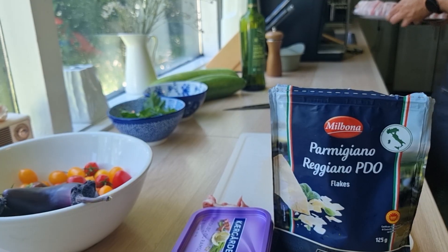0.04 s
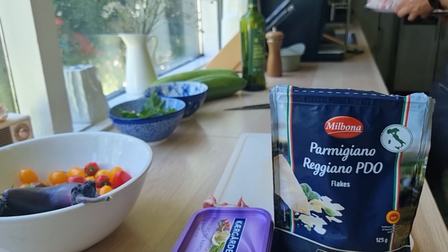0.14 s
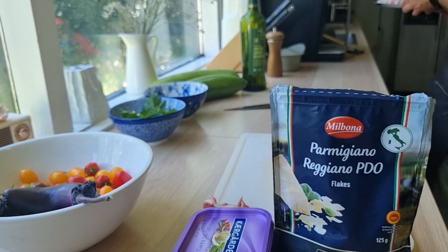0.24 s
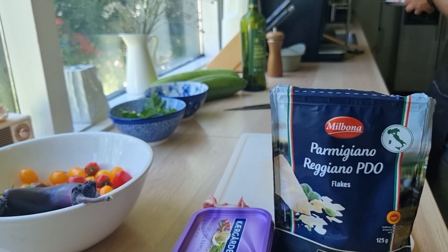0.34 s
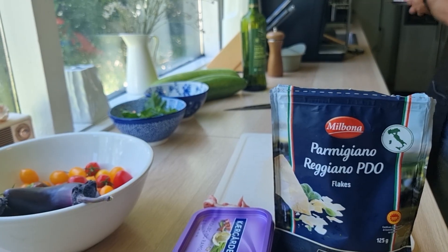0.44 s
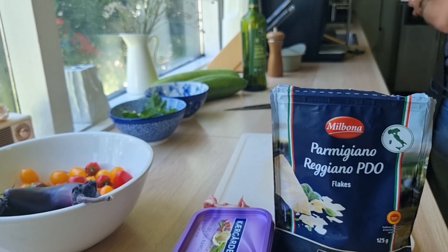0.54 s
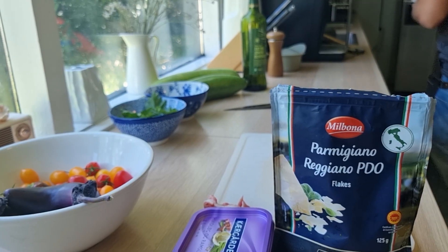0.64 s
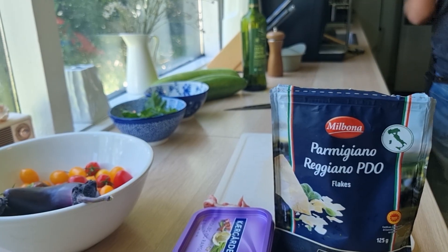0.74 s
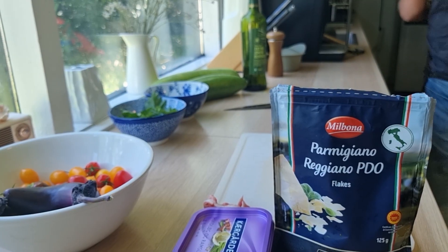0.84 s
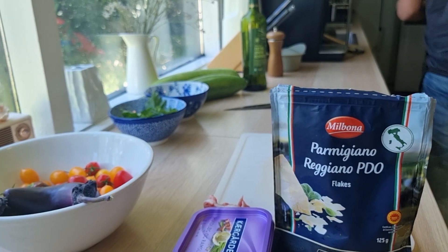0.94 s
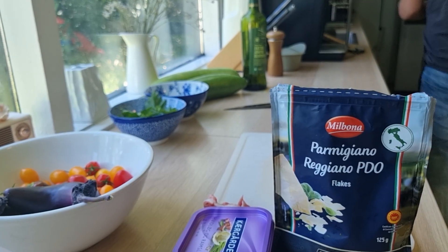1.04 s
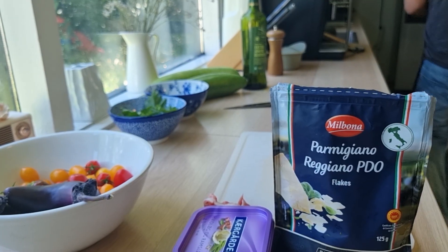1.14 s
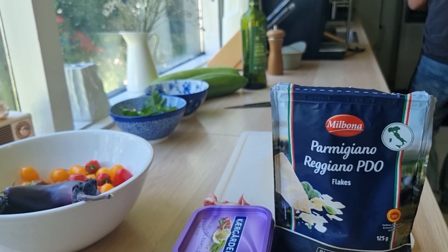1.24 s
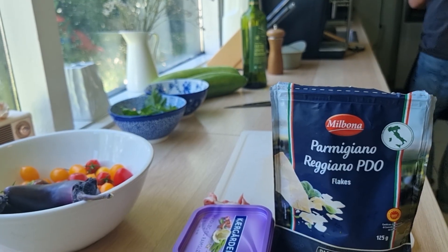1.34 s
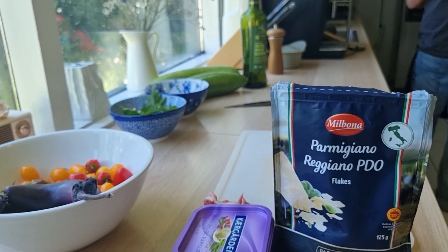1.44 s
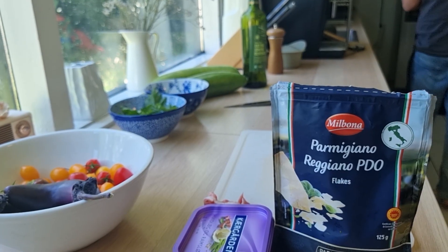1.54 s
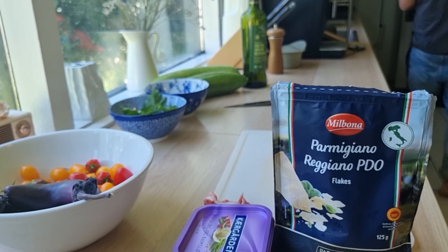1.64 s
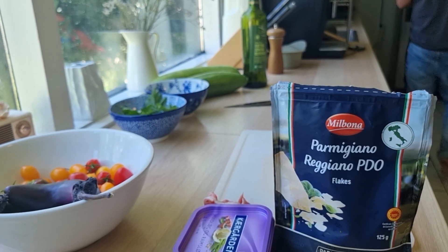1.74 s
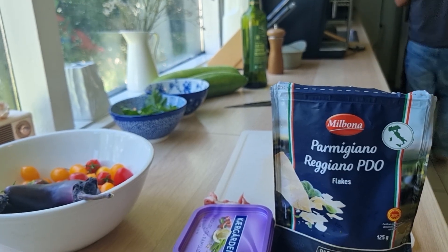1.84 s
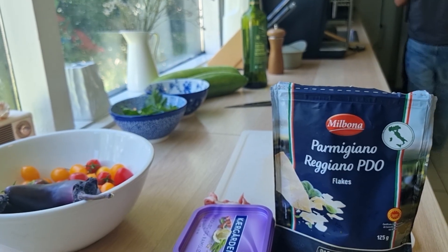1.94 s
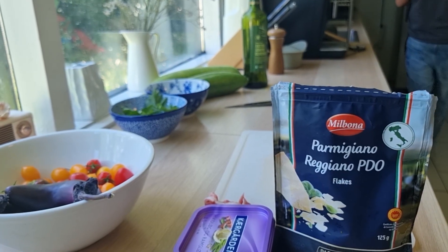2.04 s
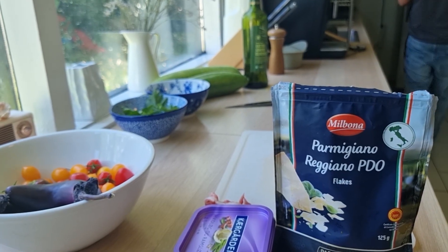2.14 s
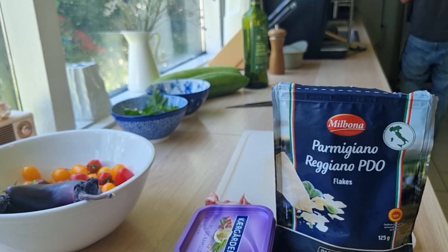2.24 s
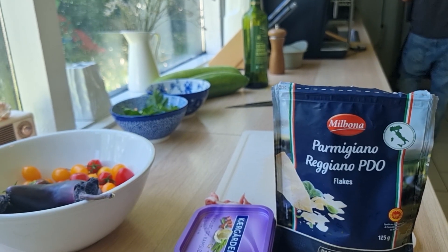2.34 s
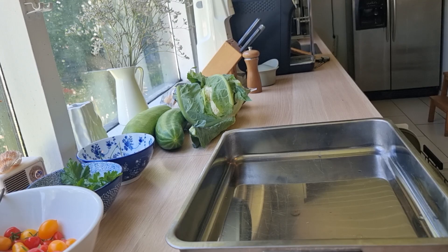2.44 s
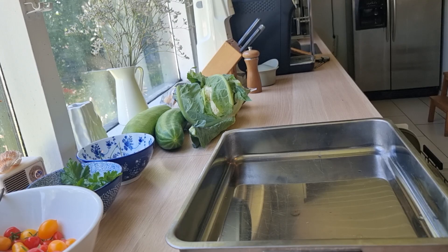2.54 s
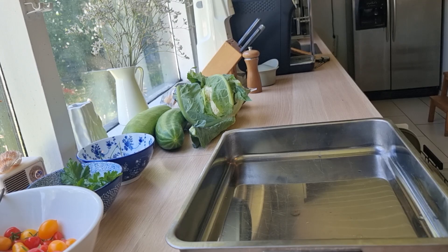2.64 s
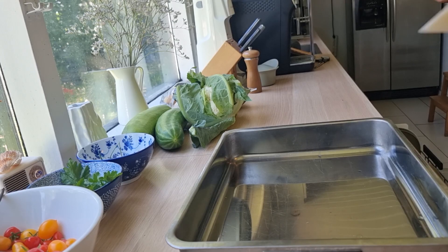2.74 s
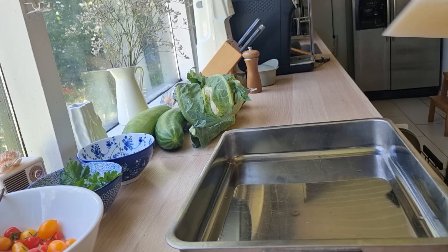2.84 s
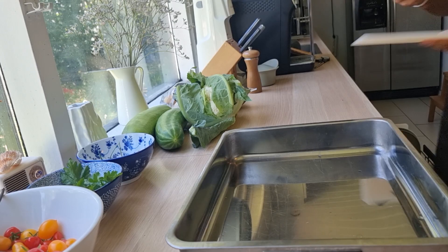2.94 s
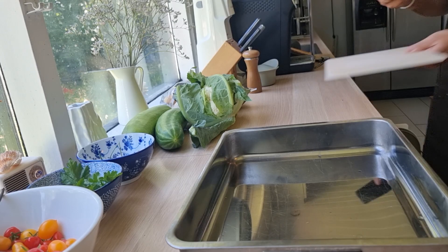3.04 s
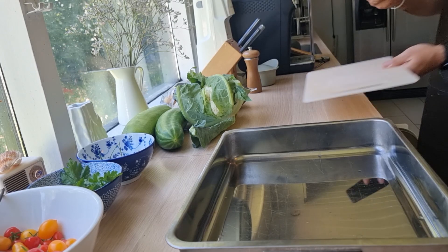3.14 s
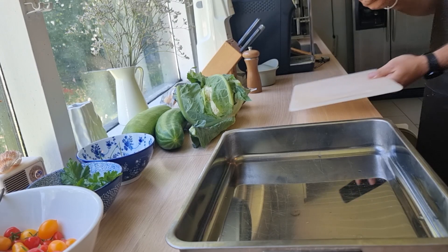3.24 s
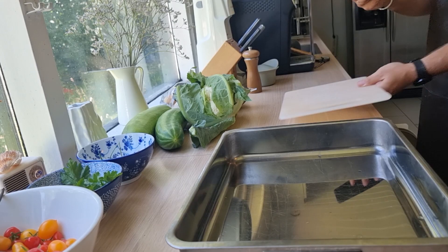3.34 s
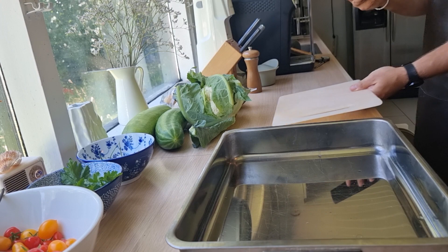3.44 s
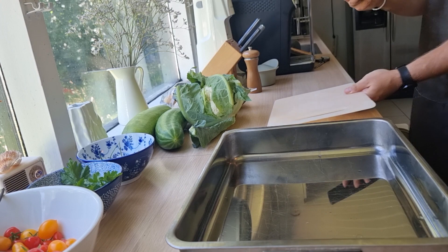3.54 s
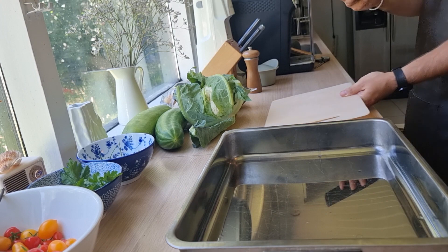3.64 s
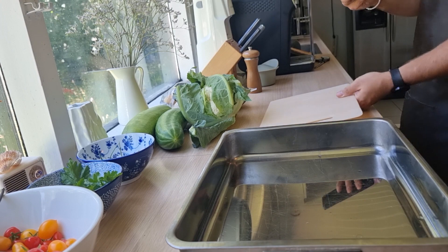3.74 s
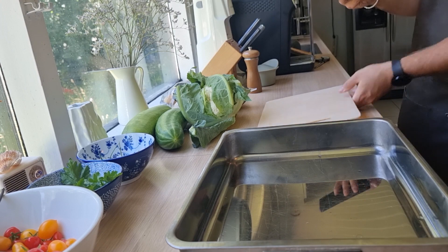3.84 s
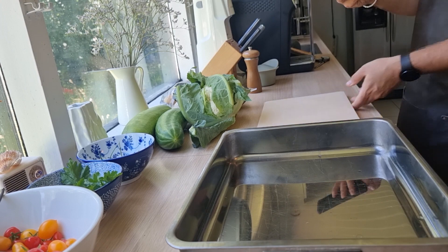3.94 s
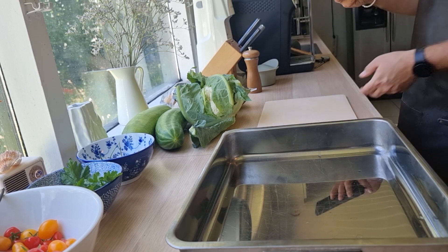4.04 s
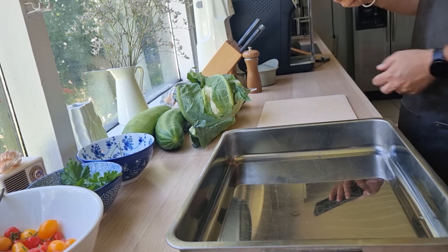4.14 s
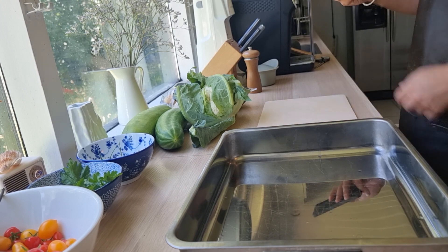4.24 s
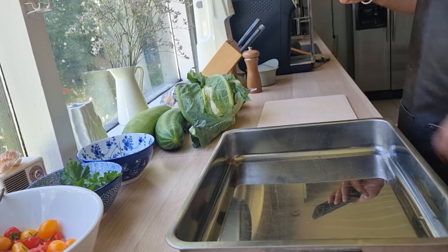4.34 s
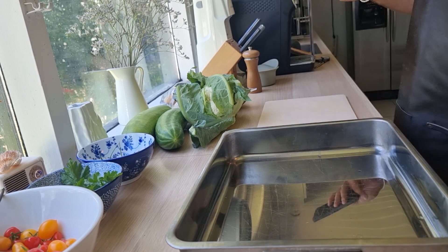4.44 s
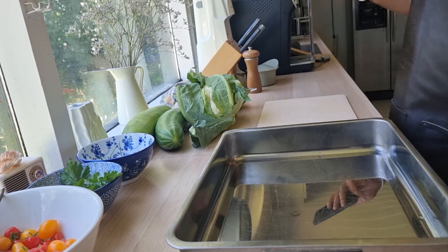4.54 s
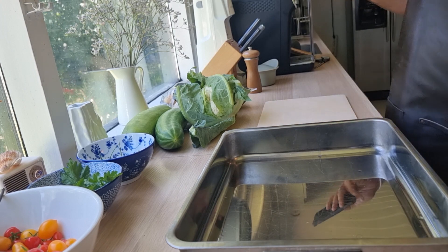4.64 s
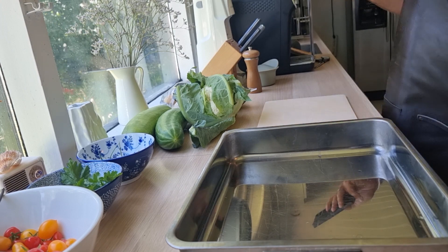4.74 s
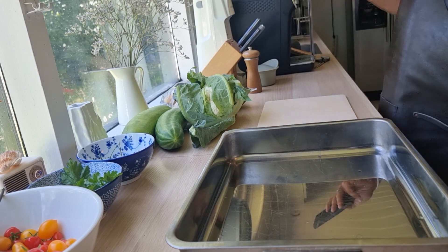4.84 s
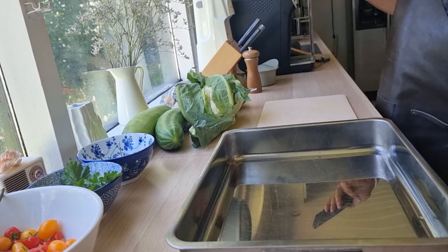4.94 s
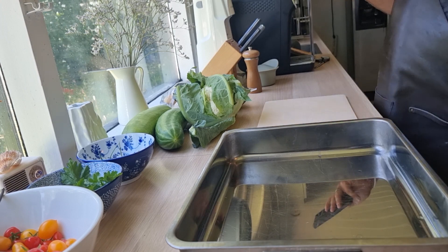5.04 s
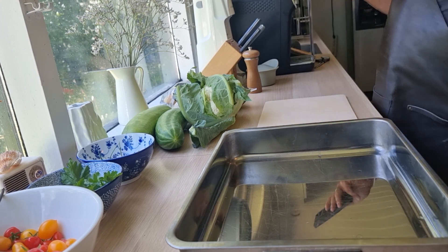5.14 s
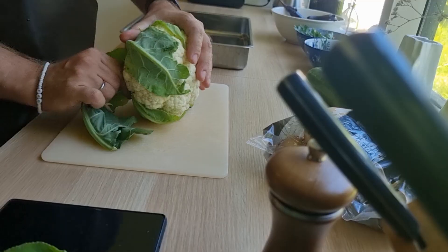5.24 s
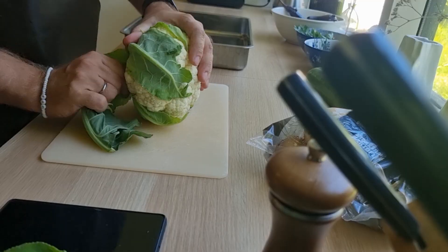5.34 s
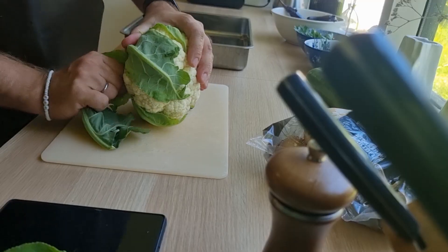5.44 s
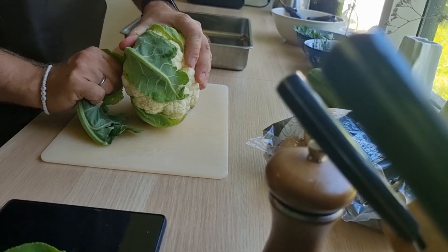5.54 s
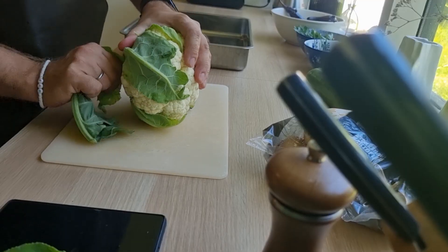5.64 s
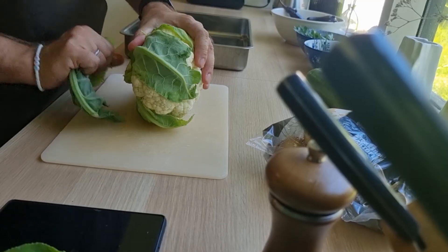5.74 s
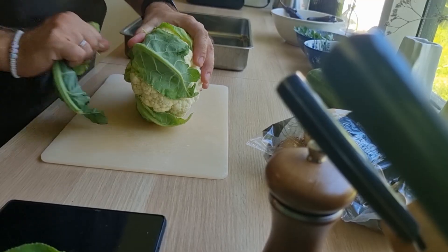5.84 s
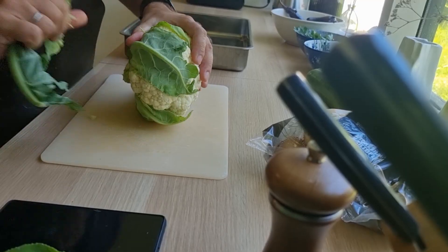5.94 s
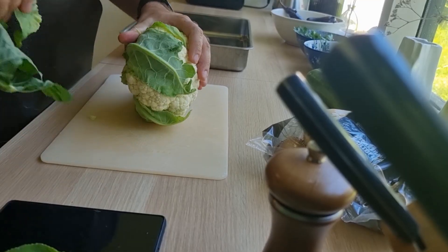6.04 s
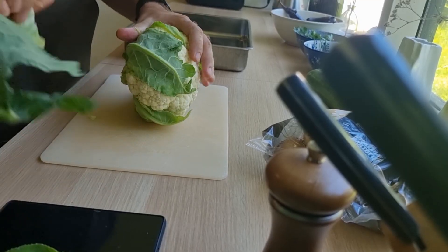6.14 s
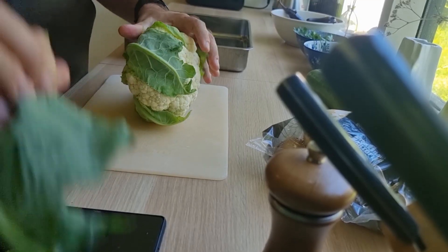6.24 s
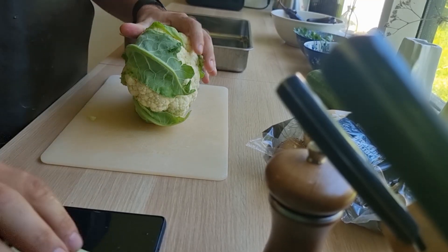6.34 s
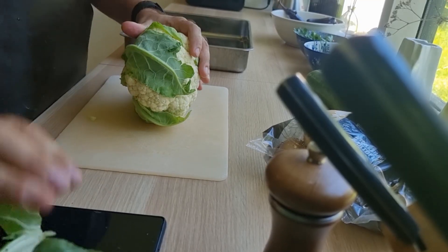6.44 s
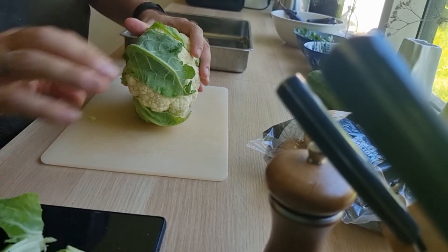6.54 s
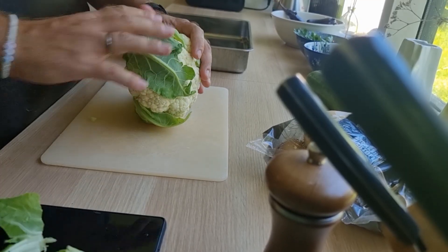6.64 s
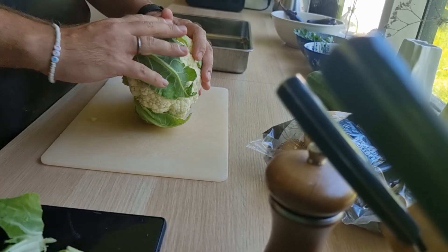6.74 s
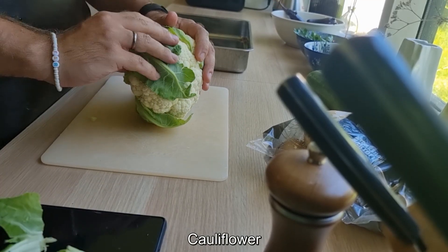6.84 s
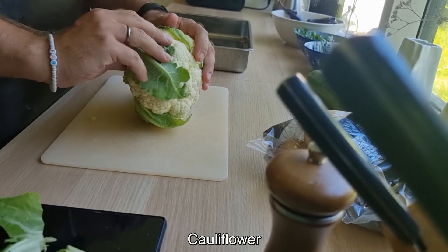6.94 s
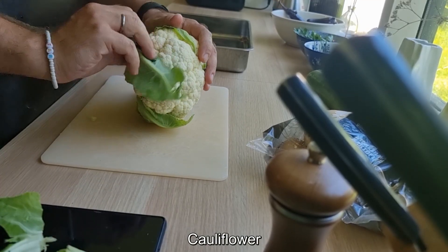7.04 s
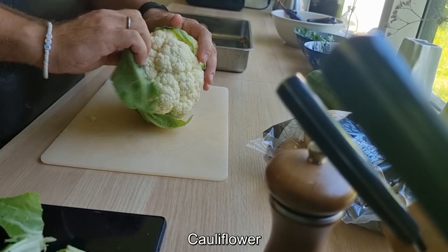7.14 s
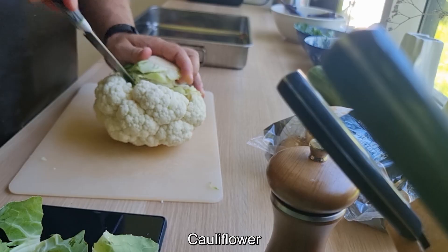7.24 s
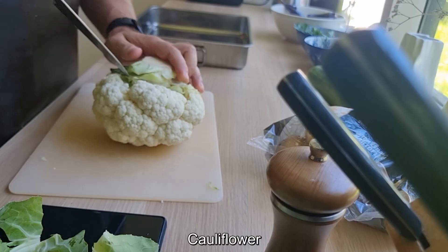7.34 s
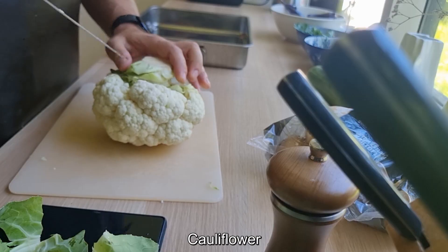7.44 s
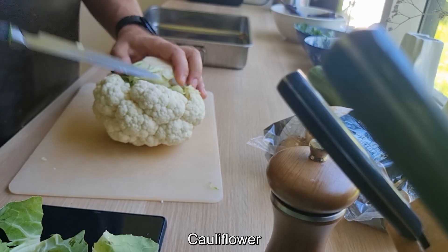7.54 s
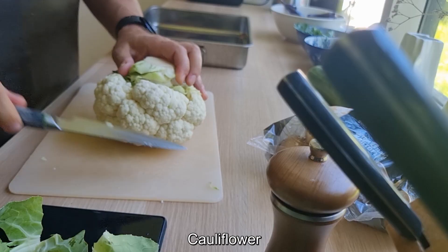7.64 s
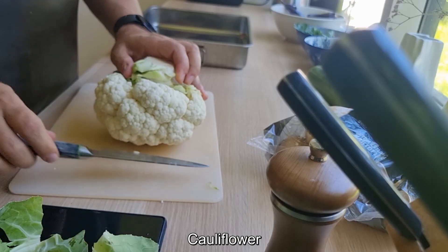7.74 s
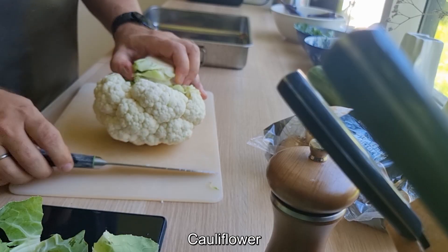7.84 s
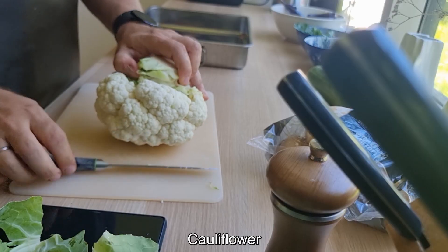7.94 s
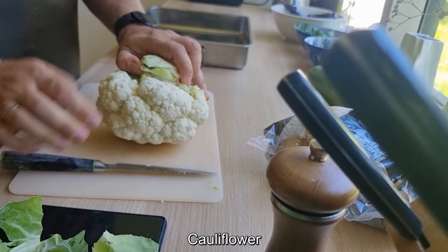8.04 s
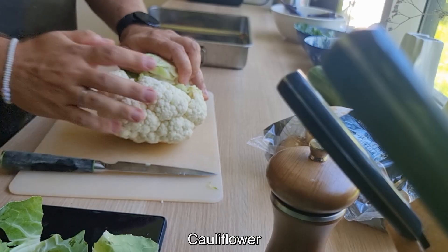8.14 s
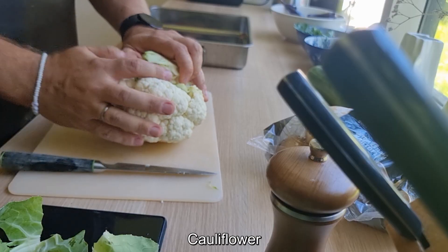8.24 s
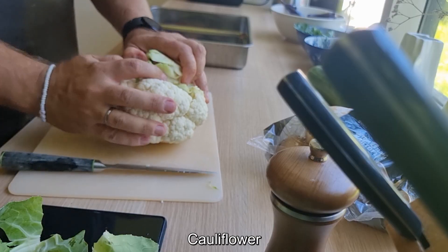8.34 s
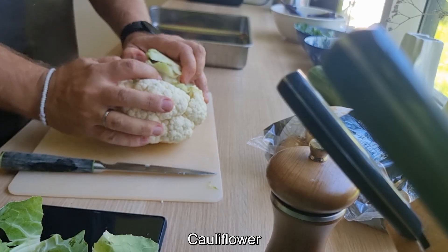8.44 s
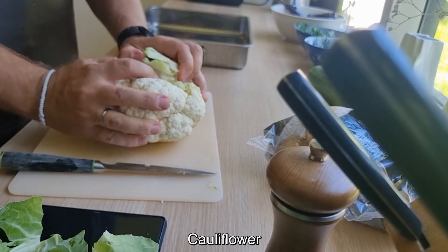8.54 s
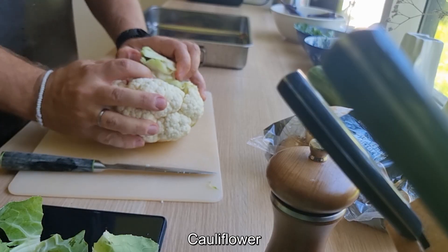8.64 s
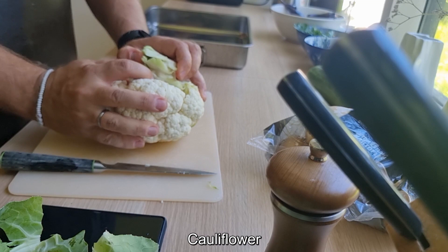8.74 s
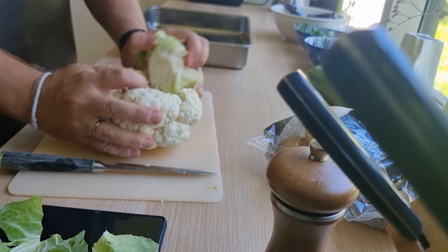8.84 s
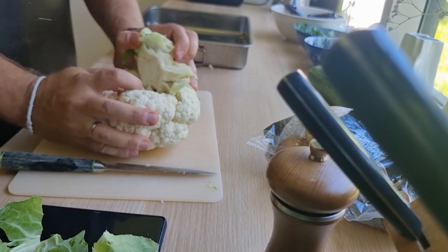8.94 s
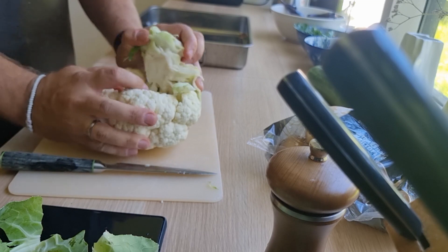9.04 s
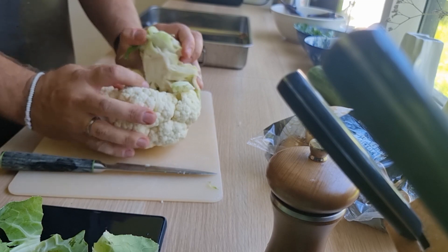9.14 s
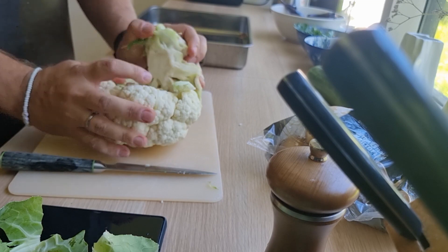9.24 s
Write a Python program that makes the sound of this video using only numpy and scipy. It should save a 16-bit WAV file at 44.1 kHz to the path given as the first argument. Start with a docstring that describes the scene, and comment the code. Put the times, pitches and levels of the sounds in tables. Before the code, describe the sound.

A fridge hums in a home kitchen while soft footsteps move about. To the right, a tray rattles onto a wooden counter and a cutting board knocks down after it. Then, closer and on the left, cauliflower stems snap and thump the board, leaves rub and tear, and one drops into a hollow bin. A knife clatters down before a final loud crack. Two spaced microphones pick up the work.

```python
"""A home kitchen: a fridge hums over rumble, whirr and hiss while someone steps about. A tray and a cutting
board land on a wooden counter, each knock a run of tiny impacts that makes the wood ring. Cauliflower stems
snap and thump the board, leaves rub and tear, one drops into a hollow bin, and a knife clatters down
between the snaps. The background shifts in level a few times. Two spaced microphones hear the work first
on the right, then closer and on the left."""
import sys
import numpy as np
from scipy import signal
from scipy.fft import rfft, irfft
from scipy.io import wavfile
from scipy.ndimage import uniform_filter1d

SR = 44100
rng = np.random.default_rng(int(sys.argv[2]) if len(sys.argv) > 2 else 0)


def waveform_to_disk(signal):
    """Save audio, clipped to [-1, 1], as 16-bit WAV at the path in sys.argv[1]."""
    frames = np.transpose(np.atleast_2d(signal))
    scaled = np.clip(frames, -1, 1) * 32767
    samples = np.round(scaled).astype(np.int16)
    wavfile.write(sys.argv[1], SR, samples)


N = 410130
TURN_S = 5.15   # the work moves from right to left

# background levels, held until the next row:
# start_s, building_db, rumble_db, drone_db, low_hum_db, high_hum_db
BACKGROUND_LEVELS = [(0, -43.5, -39.5, -40.5, -32.5, -31), (2.45, -41, -39.5, -52, -31.5, -31),
                     (5.2, -42.5, -34, -50, -34.5, -27), (7.28, -52, -32.5, -72, -43, -27.5)]
# the pitches at which the cutting board rings (its modes): pitch_hz, width_hz, level_db
BOARD_MODES = [(609, 243, -4), (685, 47, 2), (765, 50, 2), (1010, 45, 1.5), (1134, 77, -4.5), (1357, 46, 0),
               (1536, 60, -7.5)]
# the bright modes of a breaking stem: pitch_hz, width_hz, level_db
STEM_MODES = [(2100, 1200, 0), (2750, 330, 4.5), (3370, 770, 9.5), (4490, 990, 11.5), (5500, 5700, 8.5),
              (7170, 3000, 0.5), (13000, 2400, -5)]


def amp(db):
    """Turn decibels into a gain."""
    return 10 ** (np.asarray(db) / 20)


def unit_rms(x):
    """Scale to an average (rms) level of 1."""
    return x / np.sqrt(np.mean(x ** 2) + 1e-20)


def peak(x, db):
    """Scale to a peak level."""
    return amp(db) * x / np.max(np.abs(x))


def glide(rows):
    """Join (time, value) points with straight lines, one value a sample."""
    return np.interp(np.arange(N) / SR, *np.transpose(rows))


def held(rows):
    """One curve a column: each value holds until the next row, with a short cross-fade."""
    starts, *columns = np.transpose(rows)
    row = np.searchsorted(starts, np.arange(N) / SR, side="right") - 1
    return [uniform_filter1d(column[row], size=SR // 20) for column in columns]


def at_hz(points, hz):
    """Read between (pitch, value) points, with octaves evenly spaced."""
    pitches, values = np.transpose(points)
    return np.interp(np.log(hz + 1e-9), np.log(pitches), values)


def drift(rate_hz):
    """A slow random wander, about 1 in size."""
    hop = 40   # samples between points
    r = np.exp(-2 * np.pi * hop * rate_hz / SR)
    slow = signal.lfilter([1], [1, -2 * r, r * r], rng.standard_normal(N // hop + 2002))[2000:]
    return np.interp(np.arange(N) / hop, np.arange(len(slow)), unit_rms(slow))


def resonate(x, hz, width_hz):
    """One resonance: it passes its own pitch at full level and weakens the rest."""
    r = np.exp(-np.pi * width_hz / SR)
    gain = (1 - r * r) / 2
    return signal.lfilter([gain, 0, -gain], [1, -2 * r * np.cos(2 * np.pi * hz / SR), r * r], x + 1e-18)


def body(x, modes, centre_hz=1000, octaves=1000.0):
    """An object shaken by x rings in all its modes, most within `octaves` of the centre."""
    tap = signal.unit_impulse(SR // 12)
    ringing = 0
    for k, (hz, width, db) in enumerate(modes):
        weight = amp(db) / (1 + (np.log2(hz / centre_hz) / octaves) ** 2)
        ringing = ringing + (-1) ** k * weight * resonate(tap, hz, width)
    return signal.fftconvolve(x, ringing / np.sqrt(np.sum(ringing ** 2)))[:len(x)]


def diffuse(spectrum, size=N):
    """Stereo noise from all around: the two sides are alike in the bass and partly opposed near 1 kHz."""
    # how well left and right agree: pitch_hz, likeness (-1 to 1)
    likeness = [(60, 0.39), (130, 0.78), (290, 0.55), (640, -0.45), (1410, -0.37), (3100, -0.059),
                (6820, -0.037), (15000, 0.054)]
    hz = np.arange(size // 2 + 1) * SR / size
    mid, side = rfft(rng.standard_normal((2, size)))
    alike = at_hz(likeness, hz)
    stereo = np.sqrt(1 + alike) * mid + np.sqrt(1 - alike) * side * [[1], [-1]]
    inside = (hz > spectrum[0][0]) & (hz < spectrum[-1][0])
    return unit_rms(irfft(amp(at_hz(spectrum, hz)) * inside * stereo, size))


def room_echo():
    """Wall reflections gather in 4 ms; then bass, middle and treble die at their own rates."""
    # time each band takes to fall 60 dB: from_hz, fade_s
    bands = [(60, 0.29), (300, 0.35), (1200, 0.35), (4000, 0.3), (9000, 0.27)]
    size, tail = 3 * 2 ** 12, 0
    t, hz = np.arange(size) / SR, np.arange(size // 2 + 1) * SR / size
    noise = rfft(diffuse([(20, 0), (20000, 0)], size))
    for (low, fade_s), (high, _) in zip(bands, bands[1:] + [(SR, 0)]):
        band = irfft(noise * ((hz >= low) & (hz < high)), size)
        fall = amp(-60 * t / fade_s)
        tail = tail + band * fall / np.sqrt(np.sum(fall ** 2))
    return tail * np.clip(t / .004, 0, 1)


def scatter(x, longest_s=.0008):
    """Three short paths (all-pass delays) smear a sound in time but keep its colour."""
    paths = signal.unit_impulse(SR // 80)
    for lag in (rng.uniform(.15, 1, 3) * longest_s * SR).astype(int):
        loop = np.zeros(lag + 1)
        loop[0], loop[-1] = 1, .6
        paths = signal.lfilter(loop[::-1], loop, paths)
    return signal.fftconvolve(x, paths)[:len(x)]


def place(out, x, start_s, room_db, into_room=None):
    """Mix a sound in with its echo; the farther microphone gets it later, with scattered treble."""
    lag_s, stop_s = 0.0004, 7.279
    late = np.roll(x, round(lag_s * SR))
    low = signal.lfilter(*signal.butter(1, 1300, fs=SR), late)
    late = low + scatter(late - low)
    direct = np.array([x, late] if start_s > TURN_S else [late, x])
    into_room = x if into_room is None else into_room
    echo = signal.fftconvolve(into_room[None], room_echo(), axes=1)[:, :len(x)]
    i = round(start_s * SR)
    sound = (direct + amp(room_db) * echo)[:, :N - i]
    if start_s < stop_s:   # a tail still ringing at stop_s stops short
        t = start_s + np.arange(sound.shape[1]) / SR
        sound = sound * amp(-900 * np.clip(t - stop_s, 0, None))
    out[:, i:i + sound.shape[1]] += sound


def room_noise():
    """Building rumble, fan whirr and hiss: broad noises that each waver a little."""
    # colours of the deep building rumble, the higher rumble, the fan and the hiss: pitch_hz, level_db
    building = [(22, -12), (35, -20), (50, -10), (70, -3)]
    rumble = [(32, -42.5), (55, -14), (79, 2.5), (102, -2.5), (123, -5), (146, -4.5), (260, -14),
              (340, -53), (570, -120)]
    whirr = [(140, -18.5), (230, -5.5), (346, 1.5), (374, -3.5), (408, -9), (545, -10), (613, -17),
             (684, -12.5), (752, -8.5), (813, -12), (908, -16), (1150, -28.5), (1500, -36), (1950, -65),
             (3300, -120)]
    hiss = [(710, -4), (1200, 1), (1770, -0.5), (2040, -4.5), (2680, -5.5), (5180, -10), (6950, -13),
            (8630, -16), (11200, -20.5), (15200, -18.5), (16000, -26)]
    # how loud the fan and the hiss are over time: time_s, level_db
    whirr_levels = [(0, -38), (.9, -38.5), (1.7, -35.5), (2.2, -38.5), (3.3, -40), (4.9, -38.5), (5.5, -35),
                    (6.75, -36), (8.7, -37), (9.3, -39)]
    hiss_levels = [(0, -45.5), (.2, -52.5), (1.7, -49), (1.9, -54.5), (2.2, -49.5), (2.7, -55), (3.1, -49),
                   (3.25, -55), (3.45, -47), (4.0, -52), (4.58, -50.5), (4.8, -53), (5.3, -46),
                   (6.0, -50.5), (6.75, -57), (7.27, -47.5), (7.3, -59.5), (9.3, -58)]
    building_db, rumble_db = held(BACKGROUND_LEVELS)[:2]
    return (amp(building_db + 3 * drift(4)) * diffuse(building)
            + amp(rumble_db + .7 * drift(7)) * diffuse(rumble)
            + amp(glide(whirr_levels) + drift(7)) * diffuse(whirr)
            + amp(glide(hiss_levels) + drift(7)) * diffuse(hiss))


def room_drones():
    """Noise through narrow resonances: a hollow throbbing drone, whirring bands and a faint high ring."""
    # narrow whirring bands: pitch_hz, width_hz, level_db
    duct_bands = [(280.2, 7.5, -48), (357.7, 1.5, -48), (755, 4.6, -46.5)]
    # thin ringing near the steel tray: pitch_hz, width_hz, level_db
    ring_modes = [(1800, 60, -3), (2780, 90, -9), (3355, 70, 2), (4380, 70, 0)]
    # how loud that ringing is over time: time_s, level_db
    ring_levels = [(2.5, -90), (2.65, -63.5), (3.05, -53.5), (3.25, -72), (4.5, -67), (5.05, -63.5),
                   (5.15, -82)]
    drone_hz, drone_width_hz = 335.7, 50
    drone_db = held(BACKGROUND_LEVELS)[2]
    noise = diffuse([(100, 0), (6000, 0)])
    drone = resonate(resonate(noise, drone_hz, drone_width_hz), drone_hz, drone_width_hz)
    out = amp(drone_db + 3.6 * drift(11.4)) * unit_rms(drone)
    for hz, width, db in duct_bands:
        out += amp(db) * unit_rms(resonate(noise, hz, width))
    ring = sum(amp(db) * resonate(resonate(noise, hz, width), hz, width) for hz, width, db in ring_modes)
    return out + amp(glide(ring_levels) + 1.2 * drift(4)) * unit_rms(ring)


def hum(pitches_hz=(79.4, 98.94)):
    """A steady hum and a lower, wavering room tone beat about twenty times a second."""
    # how far the low and the high tone wander: waver_hz, waver_db
    wavers = [(1.6, 3), (0.37, 2)]
    out = 0
    for hz, db, (waver_hz, waver_db) in zip(pitches_hz, held(BACKGROUND_LEVELS)[3:], wavers):
        gain = np.sqrt(2) * amp(db + waver_db * np.tanh(drift(2.53)))
        pitch = hz + waver_hz * drift(2.5)
        out = out + gain * np.sin(2 * np.pi * np.cumsum(pitch) / SR)
    return out


def footsteps(fade_s=0.25):
    """Each soft push of a foot swells smoothly and dies away at the pitch of the floor."""
    # footfalls: start_s, level_db, pitch_hz
    footfalls = [(0.572, -18, 47.5), (1.127, -6, 59), (1.191, -13, 60), (1.647, -5.5, 62.5),
                 (1.749, -12, 65), (2.173, -15, 53.6), (2.507, -15, 59), (3.725, -12.5, 73),
                 (4.117, -9.5, 67), (5.56, -22, 55.7), (6.3, -20, 49), (8.041, -17, 68), (8.889, -20, 61.6)]
    t, out = np.arange(SR // 2) / SR, np.zeros(N + SR)
    swell = (1 - np.exp(-t / 0.0053)) ** 2
    for start_s, db, hz in footfalls:
        i = round(start_s * SR)
        out[i:i + len(t)] -= amp(db - 60 * t / fade_s) * swell * np.sin(2 * np.pi * hz * t)
    return out[:N]


def burst(decay_s, grit_db, lead_db=-60):
    """A first impact, set by lead_db, and a dying run of tiny ones; more grit makes them more uneven."""
    t = np.arange(SR // 3) / SR
    sign, size = rng.standard_normal((2, len(t)))
    rise = 1 - np.exp(-t / .0006)
    run = amp(grit_db * size) * np.sign(sign) * rise * np.exp(-t / max(decay_s, .0004))
    run[SR // 2000] += amp(lead_db) * np.sqrt(np.sum(run ** 2))
    return run


def scuffs():
    """Short dull rubs further off, each around its own pitch."""
    # rubs: start_s, level_db, pitch_hz, decay_s
    rubs = [(0.987, -43, 2660, 0.012), (1.007, -36, 2320, 0.022), (1.225, -36, 3370, 0.006),
            (1.521, -42.5, 2680, 0.05), (1.667, -46, 1980, 0.038), (2.031, -42.5, 2920, 0.023),
            (2.049, -38.5, 2440, 0.023), (2.275, -39.5, 2700, 0.0069), (3.206, -48, 2250, 0.016)]
    out = np.zeros((2, N))
    for start_s, db, hz, decay_s in rubs:
        friction = burst(decay_s, grit_db=2.9)
        rub = resonate(resonate(friction, hz, 1.6 * hz), hz, 0.59 * hz)
        place(out, peak(rub, db), start_s, room_db=8)
    return out


def bin_thuds():
    """A leaf drops into a hollow bin; each soft bounce sets the bin ringing."""
    # bounces: start_s, level_db
    bounces = [(6.281, -10), (6.306, -24), (6.329, -25)]
    # modes of the bin: pitch_hz, width_hz, level_db
    bin_modes = [(300, 52, 8.5), (368, 35.7, 18.5), (405, 77, 14), (265, 56, 8.5), (1340, 230, -23)]
    out = np.zeros((2, N))
    soft_touch = signal.lfilter(*signal.butter(2, 1800, fs=SR), signal.unit_impulse(SR // 3))
    for start_s, db in bounces:
        place(out, peak(body(soft_touch, bin_modes), db), start_s, room_db=1)
    return out


def knife_blade():
    """The steel blade rings briefly, a little differently each time it meets the board."""
    # touches: start_s, level_db
    touches = [(7.9025, -12), (7.926, -16.5), (8.038, -15), (8.122, -40)]
    # tones of the blade: pitch_hz, level_db, fade_s (time to fall 60 dB)
    tones = [(1690, -10, 0.31), (1950, -4, 0.088), (2440, -16, 0.29), (2960, 11.5, 0.014), (3630, -3, 0.06),
             (4228, -18, .25), (4770, -7, 0.034), (6100, -15, 0.031), (10700, -6, 0.012), (13050, -9, .01),
             (15600, -10, .009)]
    out, t = np.zeros((2, N)), np.arange(SR // 3) / SR
    rise = 1 - np.exp(-t / 0.00043)
    for start_s, db in touches:
        ring = sum(amp(tone_db + rng.normal(0, 2.7) - 60 * t / fade_s) * np.sin(2 * np.pi * hz * t)
                   for hz, tone_db, fade_s in tones)
        place(out, peak(ring * rise, db), start_s, room_db=-4.5)
    return out


def pings():
    """Single dying tones that stand out of some knocks and snaps."""
    # tones: start_s, level_db, pitch_hz, fade_s (time to fall 60 dB)
    tones = [(2.4795, -27, 2930, .03), (2.49, -33, 2470, .025), (3.766, -30, 2640, .04),
             (5.55, -17, 3290, 0.055), (8.883, -7, 819, 0.078), (8.883, -3.5, 1112, 0.04),
             (8.887, -14, 4570, 0.062), (8.887, -30, 7500, .035)]
    out, t = np.zeros((2, N)), np.arange(SR // 3) / SR
    rise = 1 - np.exp(-t / 0.00052)
    for start_s, db, hz, fade_s in tones:
        tone = amp(-60 * t / fade_s) * rise * np.sin(2 * np.pi * hz * t)
        place(out, peak(tone, db), start_s, room_db=-6)
    return out


def blows(rows, click_modes, board_modes, grit_db, lead_db, counter_hz, contact_hz):
    """Bursts of impacts ring a bright click, the board and the counter; a lower contact_hz is duller."""
    # modes of the wooden counter: pitch_hz, width_hz, level_db
    counter_modes = [(138.7, 37, -14), (190, 18, -13), (331, 190, -4), (389, 40, 1.5), (421.6, 8.6, 5.5),
                     (491, 190, 10)]
    out, touch = np.zeros((2, N)), np.zeros(SR // 12)
    n = np.arange(SR // 100)
    touch[:len(n)] = (n + 1) * np.exp(-2 * np.pi * contact_hz * n / SR)
    counter = body(touch, counter_modes, counter_hz, octaves=0.27)
    for start_s, click_db, click_hz, board_db, board_hz, counter_db, decay_s, room_db in rows:
        own_ring = body(touch, [(click_hz, click_hz / 3.2, 0)])
        click = body(touch, click_modes, click_hz, octaves=9.7) + amp(6.5) * own_ring
        board = body(touch, board_modes, board_hz, octaves=0.58)
        sound, into_room = np.zeros((2, SR // 3))
        for ringing, db, push_s, send_db in ((click, click_db, decay_s, 0),
                                             (board, board_db, .6 * decay_s, -7),
                                             (counter, counter_db, decay_s + 0.0028, 0)):
            impacts = burst(push_s, grit_db, lead_db)
            part = peak(signal.fftconvolve(impacts, ringing)[:len(sound)], db)
            sound += part
            # the echo is fed one clean ring in place of the whole rattle
            same_energy = np.sqrt(np.sum(part ** 2) / np.sum(ringing ** 2))
            into_room[:len(ringing)] += amp(send_db) * same_energy * ringing
        place(out, sound, start_s, room_db, into_room)
    return out


def counter_knocks():
    """Tray, board and knife land and rattle on the counter; the far knocks carry more echo."""
    # landings: start_s, click_db, click_hz, board_db, board_hz, counter_db, decay_s
    knocks = [(2.384, -65, 2000, -36, 704, -53, 0.0074), (2.472, -45, 6000, -26, 800, -39, 0.0022),
              (2.4818, -27, 2900, -18.5, 800, -23, 0.018), (2.4920, -25, 2430, -12.5, 806, -23, 0.035),
              (2.5085, -18.5, 2030, -14, 830, -18.5, 0.018),
              (2.5296, -22.5, 1740, -11.5, 790, -18.5, 0.012), (2.548, -27, 2630, -36, 800, -27, 0.011),
              (2.576, -32, 2880, -31, 800, -22.5, 0.019), (3.51, -65, 1810, -26, 805, -30.5, 0.0054),
              (3.6703, -29.5, 2930, -15.5, 930, -27.5, 0.0037),
              (3.7195, -14.5, 3770, -1, 914, -17.5, 0.011), (3.7300, -10.5, 1890, -16, 756, -19, 0.0052),
              (3.7390, -37, 3550, -14, 810, -26, 0.0025), (3.7636, -33, 2550, -10, 860, -41, 0.0046),
              (3.794, -29, 2490, -20, 1200, -29, 0.0051), (3.81, -39, 2460, -16, 1050, -30.5, 0.0043),
              (4.0123, -32.5, 2650, -29.5, 800, -53, 0.0032), (4.1109, -21, 1830, -18, 800, -18.5, 0.021),
              (7.903, -16, 6000, -13, 880, -13.5, 0.012), (7.9257, -13, 3200, -9, 890, -25, 0.0054),
              (7.9360, -10.5, 1900, -11.5, 870, -39, 0.014), (8.0361, -38, 6000, -9, 930, -9, 0.001),
              (8.0362, -6, 3240, -17, 1310, -41, 0.0018), (8.045, -12, 1760, -7, 730, -29, 0.0039),
              (8.0492, -10.5, 1790, -9.5, 1100, -10, 0.0079), (8.1215, -26, 6550, -42, 800, -26, 0.0032)]
    far_room_db, near_room_db = 7.5, -4.5
    far = [(*row, far_room_db) for row in knocks if row[0] < TURN_S]
    near = [(*row, near_room_db) for row in knocks if row[0] > TURN_S]
    # bright modes of a hard knock: pitch_hz, width_hz, level_db
    click_modes = [(1460, 390, 30), (1940, 510, 22), (2560, 1100, 20.5), (3330, 480, 13), (5460, 1400, -5),
                   (6900, 1100, -6)]
    return sum(blows(rows, click_modes, BOARD_MODES, grit_db, lead_db=-1, counter_hz=138, contact_hz=hz)
               for rows, grit_db, hz in ((far, 3.2, 7700), (near, 5.3, 7300)))


def leaf_rustle(depth_db=30):
    """Leaves rub and tear: gritty friction swells and fades; a duller part rings through the board."""
    # strokes: loudest_from_s, level_db, swell_s, hold_s, fade_s, dull_db
    strokes = [(5.558, -21.5, 0.0035, 0, 0.1, 3.5), (5.769, -22, 0.0031, 0, 0.076, -6),
               (5.871, -43.5, 0.11, 0.06, 0.073, 2.5), (6.204, -55, 0.024, 0, 0.02, -14),
               (6.393, -34.5, 0.047, 0.034, 0.04, 8), (6.49, -61, 0.028, 0.0013, .03, -15),
               (6.552, -51.5, 0.03, 0.0069, 0.032, -21), (6.875, -43.5, 0.039, 0.063, 0.025, -19),
               (6.997, -36, 0.028, 0.018, 0.073, -1), (7.071, -40, 0.06, 0.019, 0.045, -3),
               (7.141, -43, 0.026, 0.0061, 0.04, -4), (7.235, -35.5, 0.092, 0.039, 0.024, -15)]
    out, t = np.zeros((2, N)), np.arange(SR // 3) / SR
    for loudest_s, db, swell_s, hold_s, fade_s, dull_db in strokes:
        grit = unit_rms(rng.standard_normal(len(t)) * amp(6 * rng.standard_normal(len(t))))
        friction = body(grit, STEM_MODES) + amp(dull_db) * body(grit, BOARD_MODES)
        dip = np.clip(np.maximum(1 - t / swell_s, (t - swell_s - hold_s) / fade_s), 0, None)
        place(out, amp(db - depth_db * dip) * friction, loudest_s - swell_s, room_db=-7.5)
    return out


def stem_snaps():
    """A stem breaks with a sharp crack, and its thump passes through the board into the counter."""
    # breaks: start_s, crack_db, crack_hz, thump_db, decay_s, room_db
    breaks = [(5.2586, -34.5, 2300, -24, 0.0023, 0), (5.529, -22, 3070, -23, 0.044, 15),
              (5.537, -27, 7050, -21, 0.01, 8), (5.5493, -10.5, 3500, -8.5, 0.0024, 3),
              (5.5514, 4.5, 3320, -0.5, 0.006, -9), (5.7187, -22, 6940, -26, 0.012, 6),
              (5.733, -7, 8900, -36, 0.0013, 4), (5.74, -15.5, 3280, -14, 0.008, 8.5),
              (5.7524, 3, 5350, -3, 0.0013, -4.5), (6.15, -32.5, 2800, -55, 0.004, 6.5),
              (6.4193, -14.5, 7500, -45, 0.002, -25), (7.0862, -6.5, 5900, -26, 0.0011, -7),
              (7.1424, -29, 2140, -30, 0.0039, 2), (7.215, -24, 3970, -40, 0.0015, -2),
              (7.241, -17.5, 4240, -38, 0.004, 3), (7.2658, -11, 6960, -18.5, 0.011, -17),
              (7.686, -43, 4330, -49, 0.0032, 9), (7.81, -45, 4500, -59, 0.0015, 1),
              (7.839, -45, 4460, -60, 0.0015, 11), (8.483, -38, 7040, -55, 0.012, 6),
              (8.501, -25.5, 9000, -54, 0.0034, -5), (8.576, -42, 6500, -53, 0.002, -9),
              (8.624, -37, 3400, -50, 0.0035, -11), (8.6821, -46, 4500, -52, 0.0027, -2),
              (8.7205, -17.5, 6200, -26, 0.0034, -4), (8.7310, -34, 12900, -55, 0.002, 4),
              (8.7756, -6.5, 3620, -5, 0.0018, -2.5), (8.832, -33, 6350, -22, 0.003, 10.5),
              (8.881, -3, 3460, 0, 0.007, 3.5), (8.8870, 2, 4330, 5.5, 0.012, -0.5),
              (9.2728, -50, 7000, -59, 0.0019, -12)]
    thump_hz, counter_loss_db = 966, 12.5
    rows = [(start_s, db, hz, thump_db, thump_hz, thump_db - counter_loss_db, decay_s, room_db)
            for start_s, db, hz, thump_db, decay_s, room_db in breaks]
    # the cauliflower's weight damps the board's low modes and stills the high ones
    damped_board = [(hz, 4.2 * width, db) for hz, width, db in BOARD_MODES if hz < 1200]
    return blows(rows, STEM_MODES, damped_board, grit_db=7, lead_db=2, counter_hz=186, contact_hz=SR)


def scene():
    """Hands at the counter over hum, footsteps and room noise."""
    hands = (counter_knocks() + stem_snaps() + knife_blade() + pings()
             + bin_thuds() + scuffs() + leaf_rustle())
    background = hum() + footsteps() + room_noise() + room_drones()
    hands_bass = signal.lfilter(*signal.butter(1, 900, fs=SR), hands)
    lean_right = amp([[-1], [1]])
    return hands - hands_bass + (background + hands_bass) * lean_right


def record(dry):
    """The microphones colour the treble and flatten the loudest peaks; the very top is cut away."""
    # bumps and dips in the treble: pitch_hz, width_hz, gain_db
    bumps = [(3240, 3900, 3), (5230, 1900, -2), (6860, 1400, 5), (8660, 2700, -2.5), (13400, 4700, 3)]
    for hz, width, db in bumps:
        dry = dry + (amp(db) - 1) * resonate(dry, hz, width)
    limited = dry / (1 + dry ** 8) ** .125
    rolled_off = signal.sosfilt(signal.cheby2(12, 16, 16350, fs=SR, output="sos"), limited)
    return signal.sosfilt(signal.cheby2(12, 60, 17080, fs=SR, output="sos"), rolled_off)


dry = scene()
out = record(dry)
waveform_to_disk(out)
```